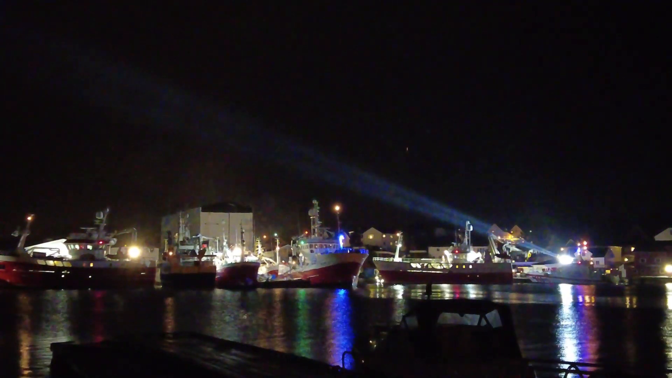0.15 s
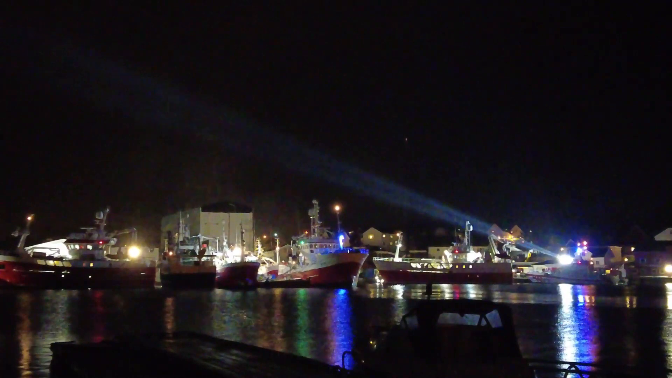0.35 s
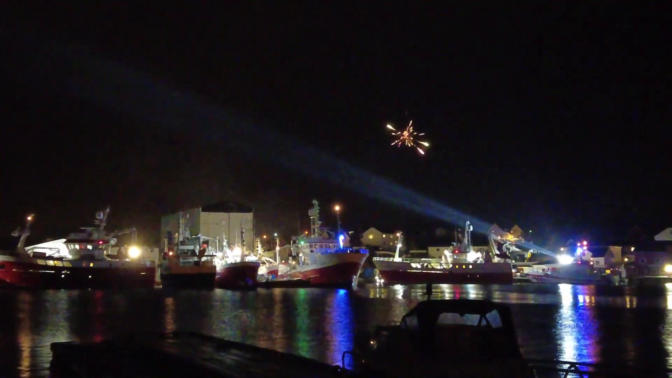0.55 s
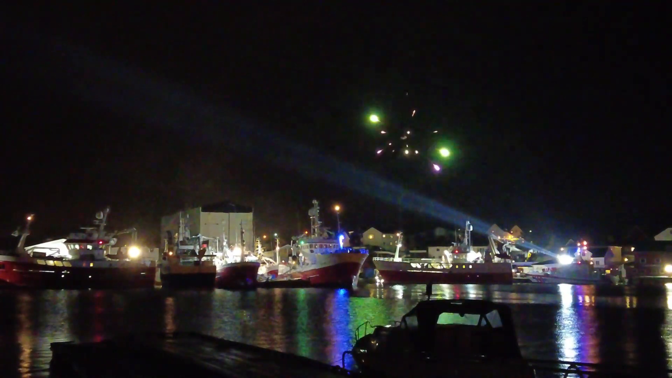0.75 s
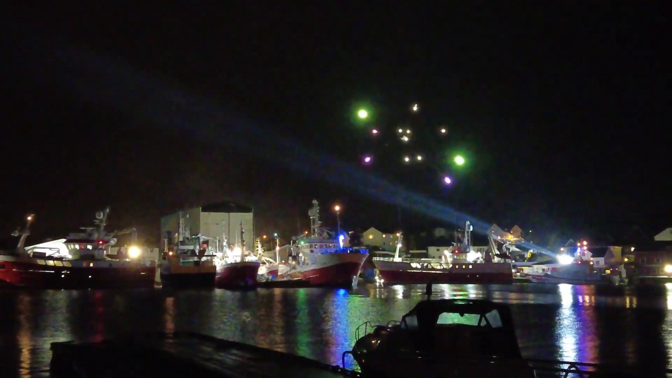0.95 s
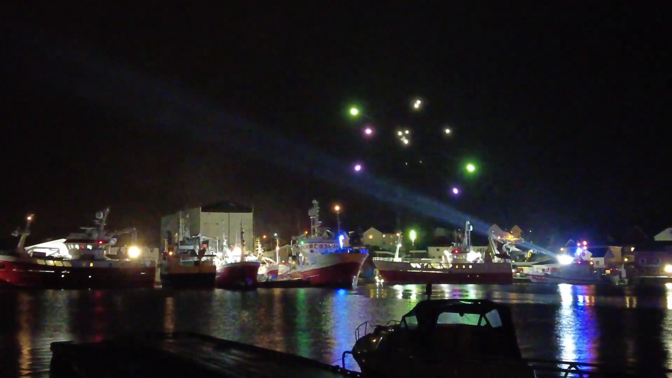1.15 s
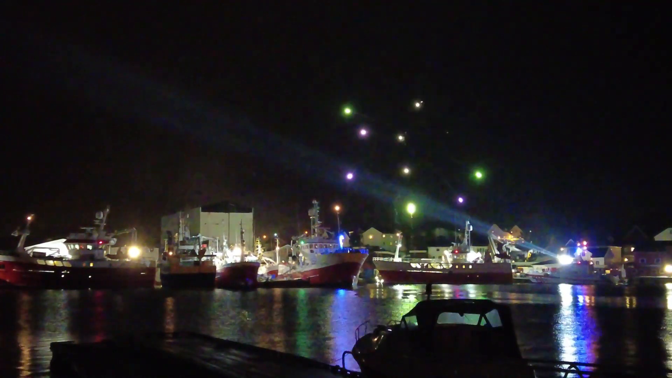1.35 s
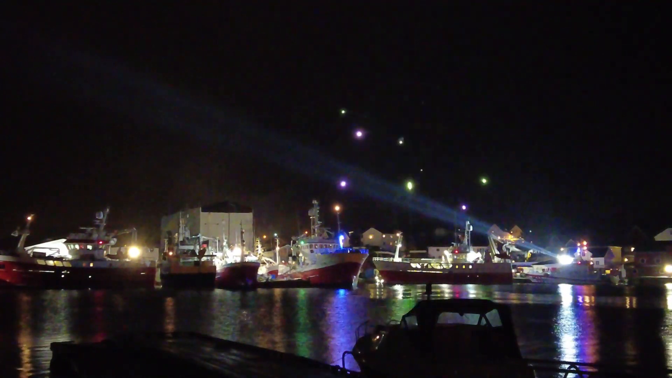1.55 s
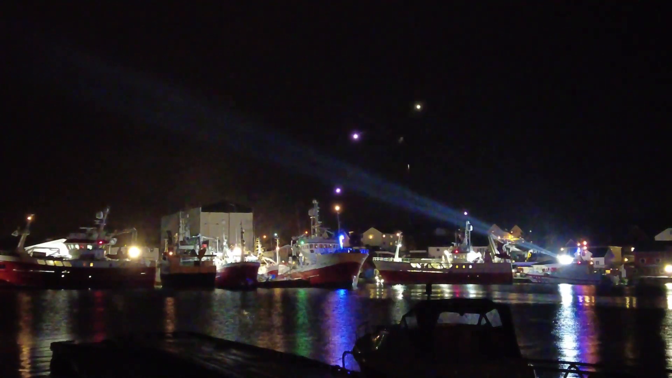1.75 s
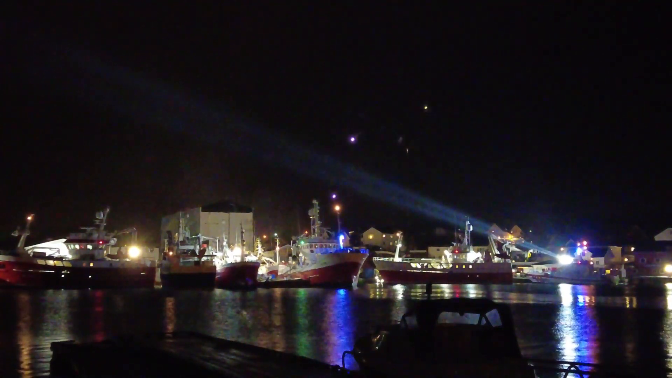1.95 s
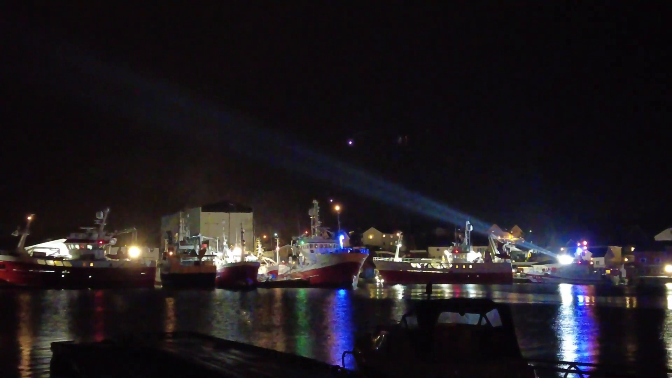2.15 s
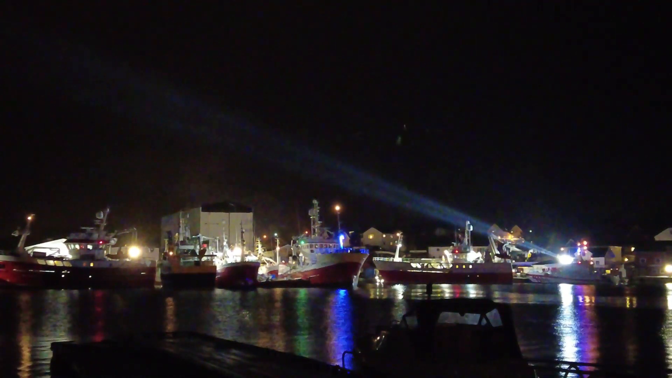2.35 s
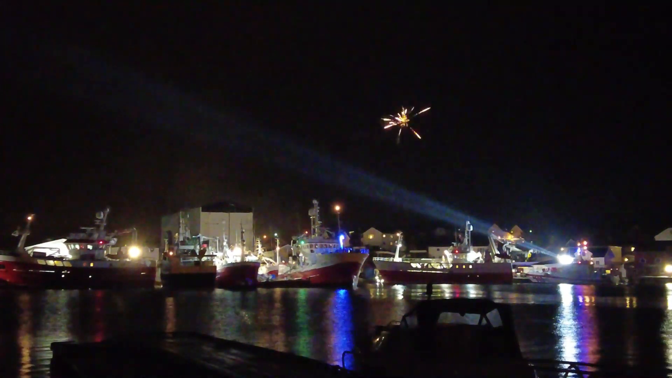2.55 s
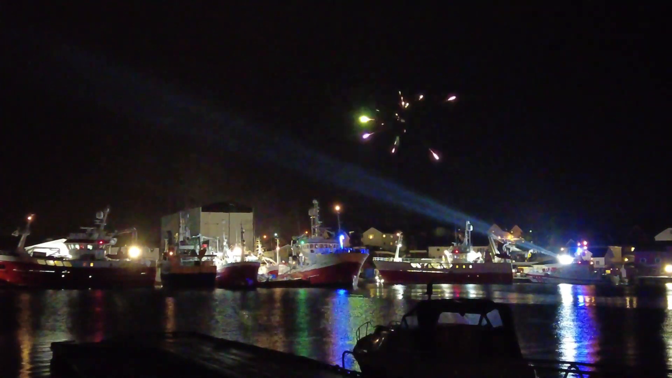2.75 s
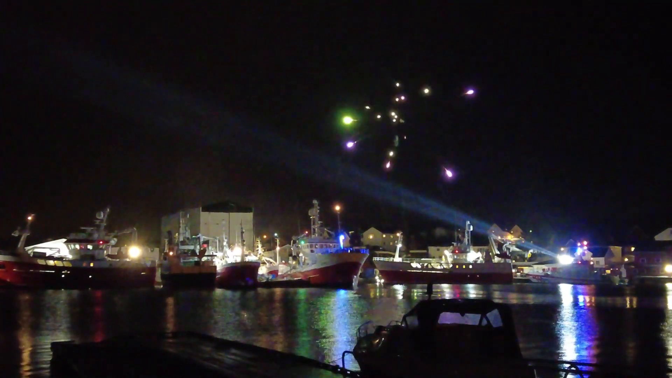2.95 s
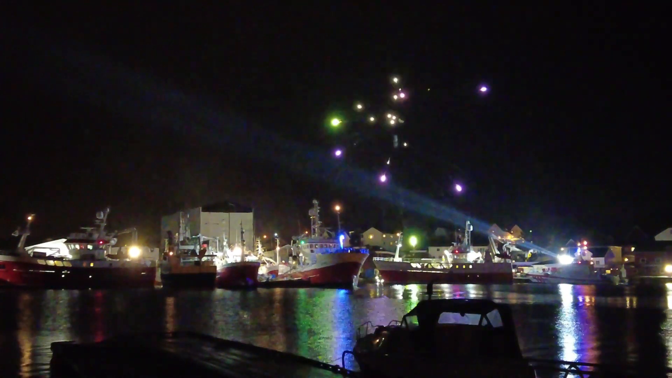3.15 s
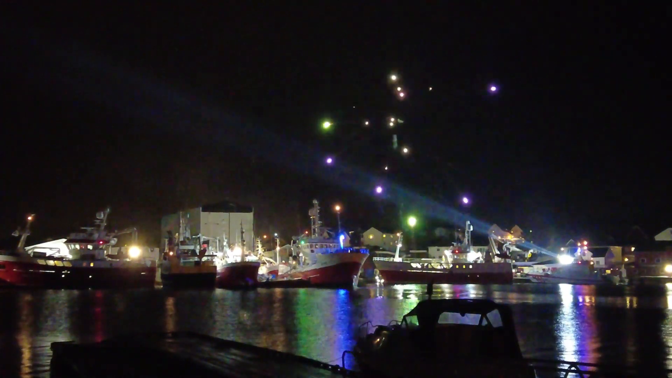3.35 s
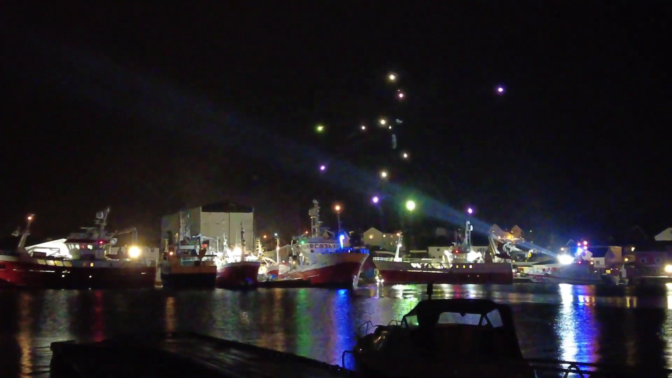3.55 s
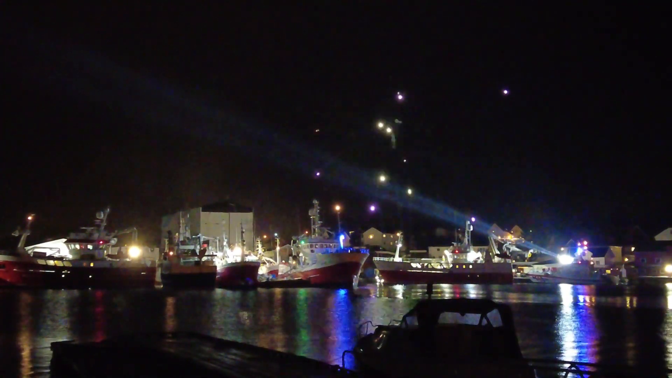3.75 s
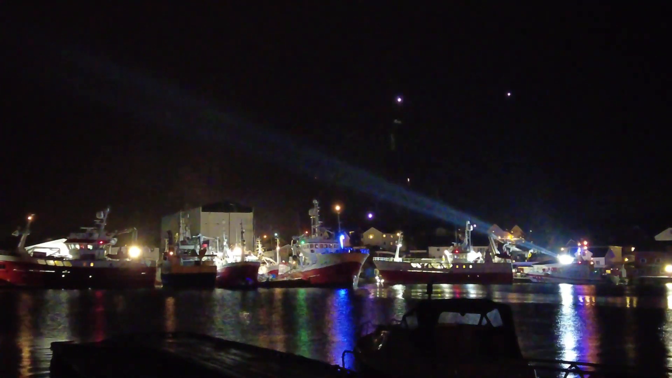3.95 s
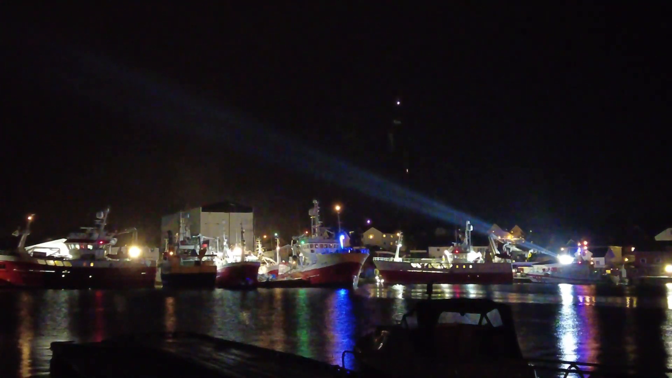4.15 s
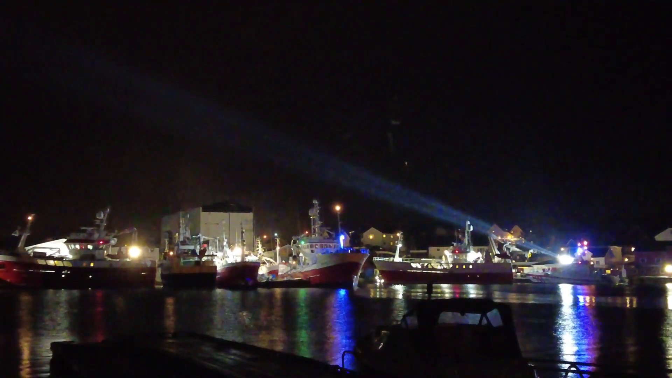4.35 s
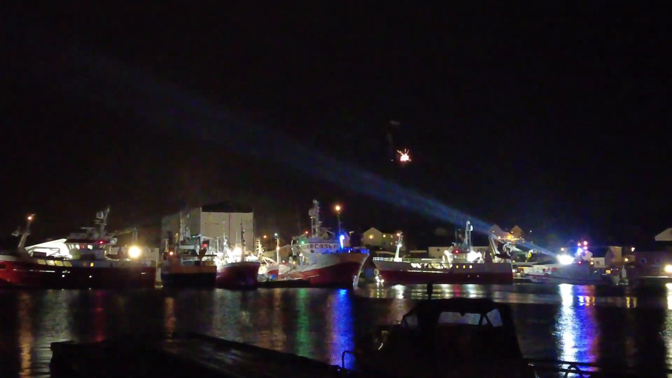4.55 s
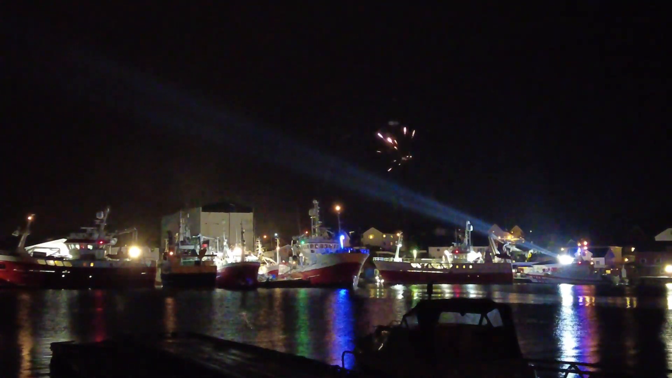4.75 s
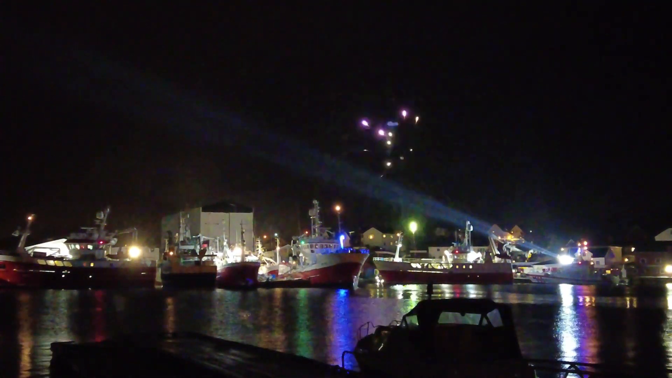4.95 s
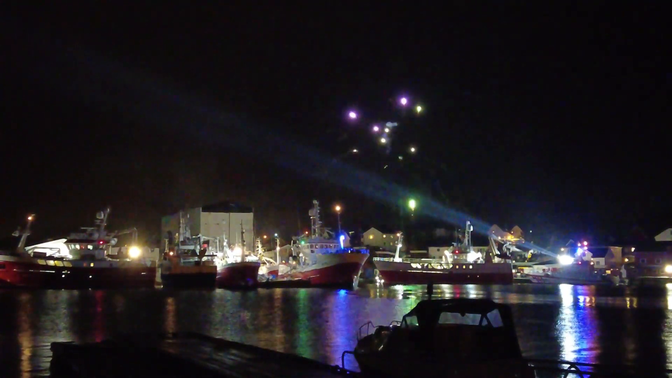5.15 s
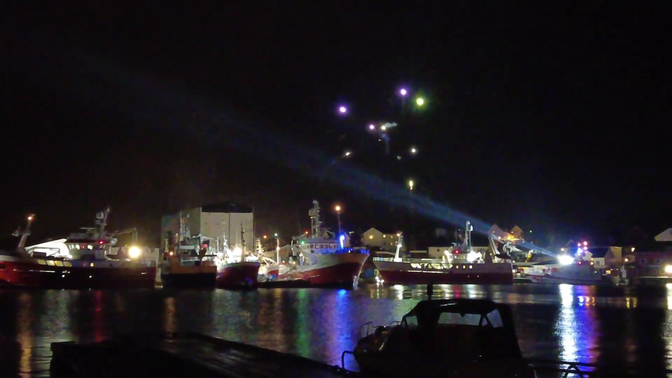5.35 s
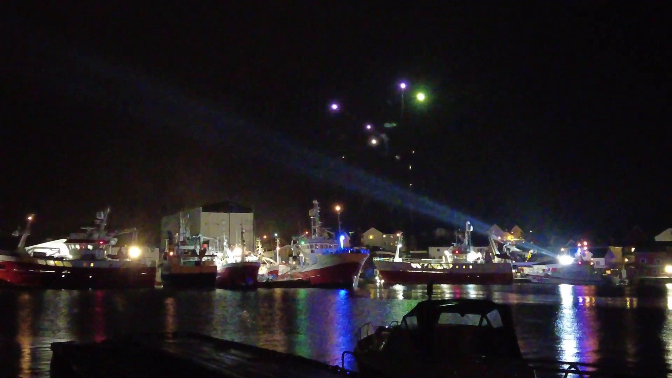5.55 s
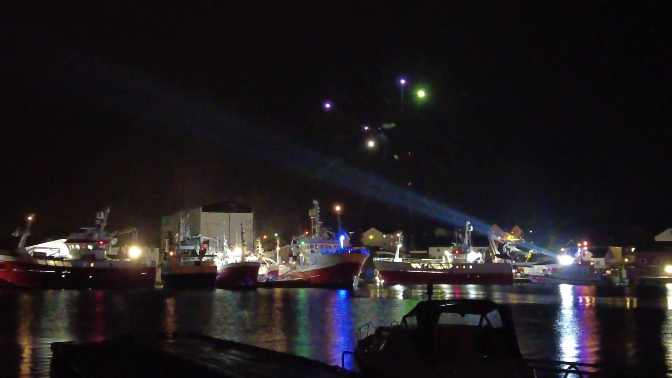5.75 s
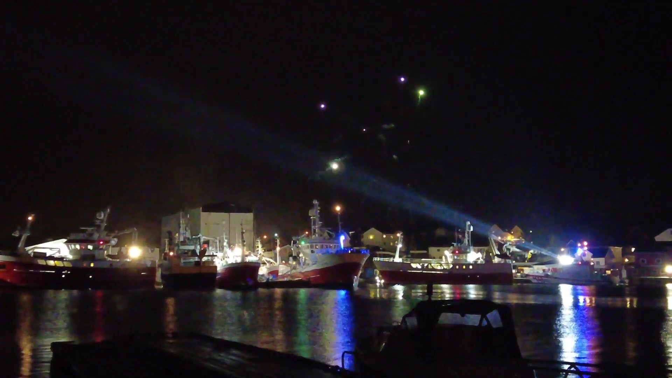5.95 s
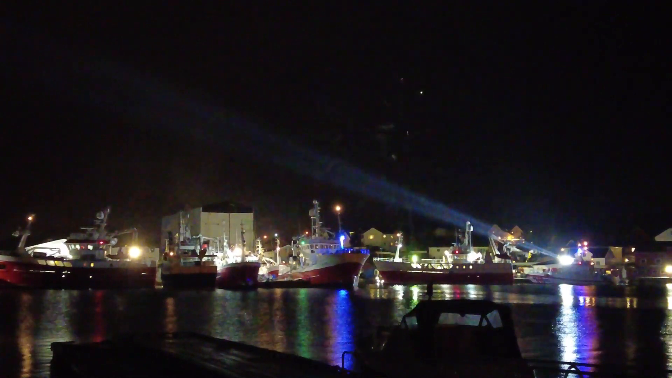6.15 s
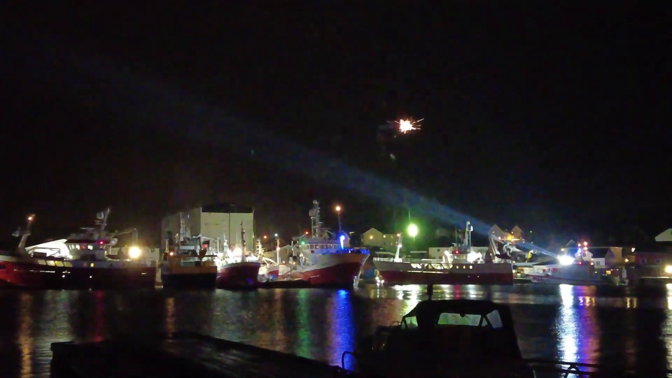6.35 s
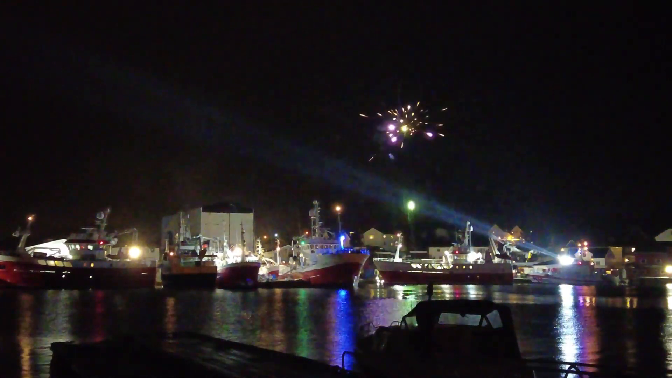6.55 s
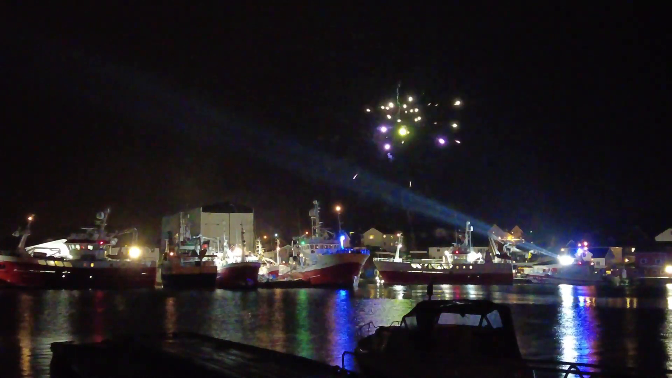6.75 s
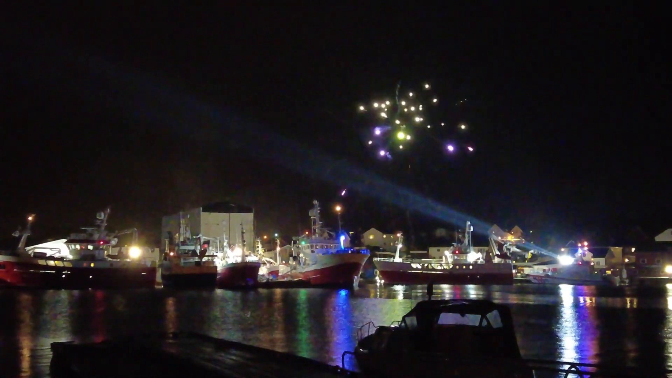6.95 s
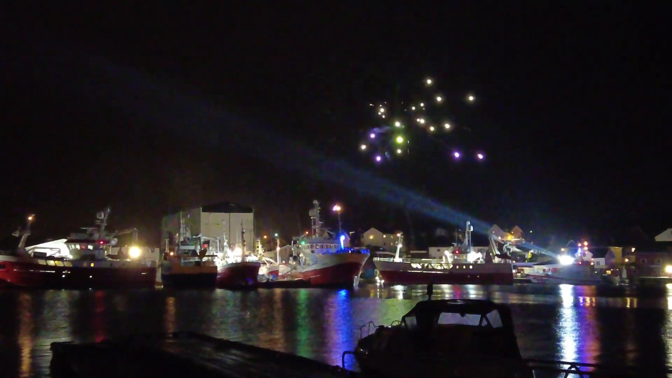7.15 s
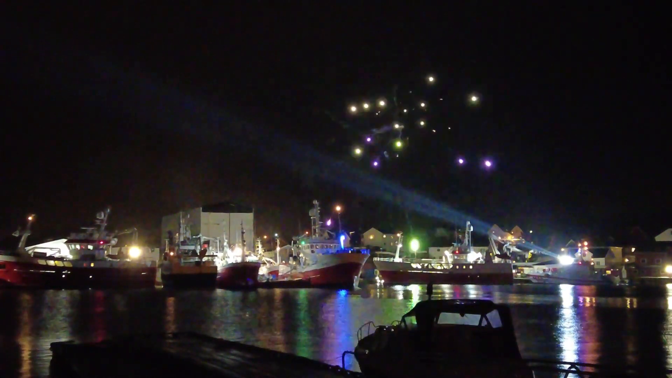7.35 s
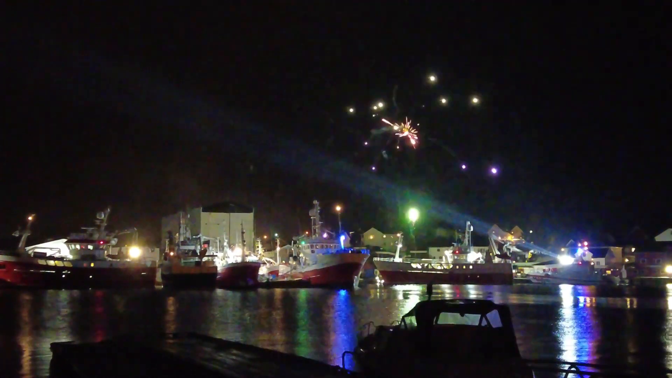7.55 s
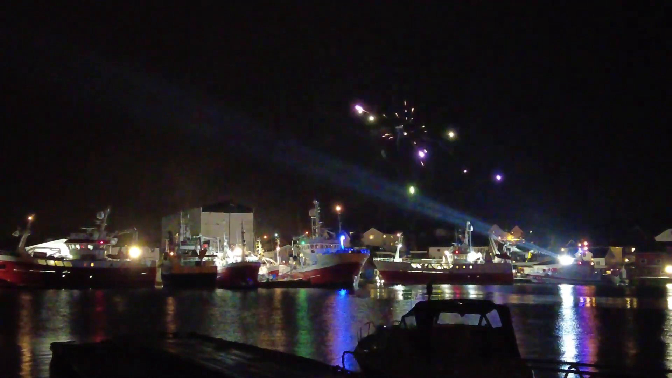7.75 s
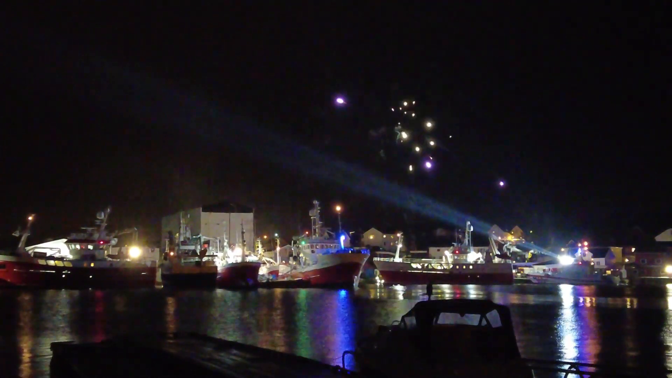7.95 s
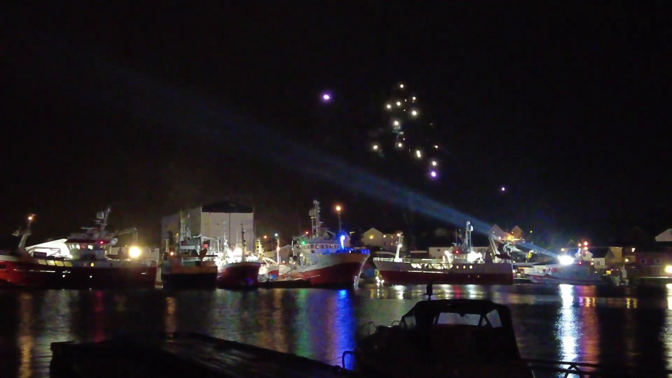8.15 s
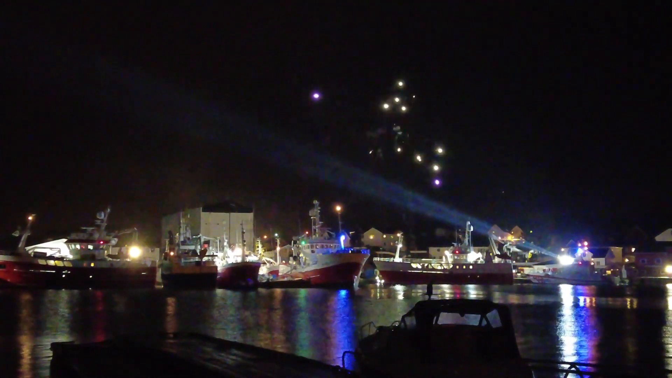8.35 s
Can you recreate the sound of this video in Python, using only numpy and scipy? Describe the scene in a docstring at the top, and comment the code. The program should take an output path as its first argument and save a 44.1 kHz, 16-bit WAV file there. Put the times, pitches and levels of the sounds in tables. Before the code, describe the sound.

Five aerial fireworks bang about two seconds apart over a night harbour, each cracking off hulls and sheds and rolling away across the water.

```python
"""A soft harbour wash, humming ship machinery and close ticks, over the end of an earlier shell's roll;
then five aerial shells burst. Each blast is an N-shaped pulse with its bounce off the water.
Hulls, sheds and quays slap it back as coloured pulses, one wall adds a short ping, and sparse random
echoes roll away. The ticks are noise snaps through casing resonances; a short hiss is gated noise."""
import sys
import numpy as np
from scipy import signal
from scipy.fft import rfft, irfft, next_fast_len
from scipy.io import wavfile
from scipy.ndimage import uniform_filter1d

SR = 44100
rng = np.random.default_rng(int(sys.argv[2]) if len(sys.argv) > 2 else 0)


def dump_mix(stems):
    """Bounce the given channels to the path in sys.argv[1] as a 16-bit WAV at rate SR."""
    frames = np.atleast_2d(stems).T  # one column per channel
    limited = np.clip(frames, -1, 1)  # hard clip at full scale
    pcm = np.round(limited * 32767).astype(np.int16)
    wavfile.write(sys.argv[1], SR, pcm)


N = 370881


def undb(db):
    """Decibels to amplitude ratio."""
    return 10 ** (np.asarray(db) / 20)


def level(x, db):
    """Scale a sound to an RMS level in dB."""
    return x * undb(db) / np.sqrt(np.mean(x ** 2))


def on_log(hz, table):
    """Read a (Hz, value) table along a logarithmic frequency axis."""
    table_hz, values = np.transpose(table)
    return np.interp(np.log(np.maximum(hz, 1)), np.log(table_hz), values)


def colour(x, table):
    """Causal filter with the gain of a (Hz, dB) table, from the folded cepstrum."""
    hz = np.arange(2049) * SR / 4096
    cepstrum = irfft(np.log(undb(on_log(hz, table))))
    middle = len(cepstrum) // 2
    cepstrum[1:middle] *= 2
    cepstrum[middle + 1:] = 0
    impulse = irfft(np.exp(rfft(cepstrum)))
    return signal.fftconvolve(x, impulse[None], axes=1)[:, :x.shape[1]]


# How alike left and right are. Each row: frequency in Hz, likeness from 0 to 1.
STEREO_LIKENESS = [(60, 0.47), (250, 0.91), (500, 0.1), (2000, 0.42), (8000, 0)]


def spread(mid, side):
    """Left and right from two unrelated signals, their likeness set by frequency."""
    size = next_fast_len(N)
    alike = np.clip(on_log(np.arange(size // 2 + 1) * SR / size, STEREO_LIKENESS), 0, 1)
    mid_part = rfft(mid, size) * np.sqrt(1 + alike)
    side_part = rfft(side, size) * np.sqrt(1 - alike)
    return irfft(np.array([mid_part + side_part, mid_part - side_part]), size)[:, :N] / np.sqrt(2)


def band(x, hz, width_hz):
    """Band-pass around a centre frequency."""
    edges = np.clip([hz - width_hz / 2, hz + width_hz / 2], 20, .45 * SR)
    return signal.sosfilt(signal.butter(2, edges, "band", fs=SR, output="sos"), x)


def crisp(x, hz, width_hz):
    """Band-pass without delay, so that neighbouring bands add up to one sharp click."""
    forward = band(x, hz, width_hz)
    return band(forward[..., ::-1], hz, width_hz)[..., ::-1]


# Brightness in the tables below is treble level against bass, usually -11 dB.
BRIGHT_FROM_HZ, USUAL_BRIGHT_DB = 930, -11


def split(x):
    """Bass and treble parts that sum to the whole."""
    low = signal.sosfiltfilt(signal.butter(3, BRIGHT_FROM_HZ, fs=SR, output="sos"), x)
    return low, x - low


def walk(rate):
    """Random levels held 1 / rate s and slewed; spread near 1."""
    hold = int(SR / rate)
    steps = np.repeat(rng.standard_normal(N // hold + 1), hold)
    return 1.145 * uniform_filter1d(uniform_filter1d(steps, hold), hold)[:N]


def add(out, s, sound, pan_db):
    """Mix a sound in at s seconds; pan_db is left minus right."""
    i = int(s * SR)
    n = min(sound.shape[-1], N - i)
    out[:, i:i + n] += sound[..., :n] * undb([[pan_db / 2], [-pan_db / 2]])


# Tone of the distant wash. Each row: frequency in Hz, relative level in dB per Hz.
WASH_COLOUR = [(12, -46.5), (20, 12), (70, 0), (104, -6), (127, -17), (154, -12.5), (193, -14),
               (255, -16.5), (542, -11), (923, -22.5), (1480, -13.5), (2260, -27), (3070, -29.5),
               (7110, -36.5), (14700, -34), (16000, -43)]
WASH_DB = -49.5  # RMS before the flicker
# Ship machinery. Each row: frequency in Hz, RMS level in dB, both before the wavering.
MACHINERY_HUM = [(58.5, -61), (99.8, -51.5), (199.6, -71), (299.4, -75)]


def harbour(bass_flicker_db=1.1, treble_flicker_db=.8, waver_hz=1.0, flutter_db=1.5):
    """Distant coloured noise, bass and treble flickering apart, plus sines that waver in pitch and level."""
    low, high = split(level(colour(spread(*rng.standard_normal((2, N))), WASH_COLOUR), WASH_DB))
    t = np.arange(N) / SR
    hum = 0
    for hz, db in MACHINERY_HUM:
        loudness = undb(db + flutter_db * walk(9)) * np.sqrt(2)
        cycles = hz * t + np.cumsum(waver_hz * walk(4.6)) / SR
        hum = hum + loudness * np.sin(2 * np.pi * cycles)
    wash = low * undb(bass_flicker_db * walk(1.45)) + high * undb(treble_flicker_db * walk(29))
    return wash + hum


# The one hiss, as a single row: start in seconds, end in seconds, centre in Hz, width in Hz,
# RMS level in dB before the grain and the gate.
HISS_BURST = (6.026, 6.102, 9000, 9000, -61)


def hiss():
    """A short hiss between two ticks: band-passed noise, made grainy by fast random level swings."""
    start, end, hz, width_hz, db = HISS_BURST
    gate = np.interp(np.arange(N) / SR, [start - .004, start, end, end + .012], [0, 1, 1, 0])
    grain = undb(8.6 * walk(330))
    return gate * grain * level(band(rng.standard_normal((2, N)), hz, width_hz), db)


# Clear ticks close by. Each row: start in seconds, nominal peak at 3.5-6.5 kHz in dB, then nominal level
# over 6 ms in dB at 1-2 kHz, at 2-3.5 kHz and above 6.5 kHz; the random rattle varies them all.
CLEAR_TICKS = [(0.0994, -31, -33, -45, -54), (0.186, -50, -49, -56, -53), (0.2033, -49, -54, -57, -63),
               (0.2254, -48, -51, -63, -55), (0.2373, -45, -38.5, -55, -54), (0.2557, -45, -46, -54, -51),
               (0.3817, -42, -43, -44.5, -56), (0.4888, -46, -59, -51, -58), (0.5247, -45, -50, -54, -53),
               (0.549, -46, -41, -49, -52), (0.7008, -43, -40, -55, -52), (0.763, -54, -55, -51, -50),
               (0.7904, -55, -60, -62, -69), (0.9126, -45, -41, -50, -54), (0.9293, -42, -38, -49, -52),
               (0.95, -41, -33.5, -48, -46), (0.9594, -39, -40, -45, -46), (1.015, -51, -47, -51, -54),
               (1.1089, -53, -58, -50, -64), (1.1362, -51, -51, -47, -55), (1.1605, -53, -69, -52, -69),
               (1.472, -33, -44, -42, -46), (1.7945, -43, -48, -49, -52), (1.858, -51, -48, -59, -45),
               (2.0244, -53, -46, -60, -53), (2.0718, -45, -50, -53, -50), (2.1033, -45, -45, -52, -49),
               (2.3303, -35.5, -34.5, -63, -48), (2.5231, -54, -47, -49, -46),
               (2.5756, -42.5, -36, -47, -48), (2.5934, -56, -41, -53, -55), (2.7492, -42, -38, -44, -47),
               (2.7874, -49, -45, -54, -55), (2.7936, -43, -37, -51, -57), (2.8766, -51, -47, -51, -54),
               (2.9038, -40, -43, -45, -46), (3.0465, -48, -42, -54, -64), (3.086, -51, -45, -57, -52),
               (3.157, -47, -59, -59, -53), (4.3879, -55, -46, -59, -52), (4.7958, -33.5, -39, -61, -49),
               (4.8396, -53, -38, -63, -53), (4.8837, -45, -43, -55, -56), (4.917, -53, -39, -50, -59),
               (4.9566, -46, -58, -62, -56), (5.005, -43, -39.5, -60, -48), (5.2316, -36, -37, -48, -51),
               (5.848, -48, -40, -51, -51), (5.9029, -34.5, -43, -60, -46), (6.0306, -50, -40, -55, -43),
               (6.0958, -48, -40, -52, -40), (6.129, -47, -41, -63, -58), (6.568, -48, -49, -59, -51),
               (6.7412, -46, -50, -46, -58), (6.7664, -42, -36, -49, -51), (6.799, -48, -58, -59, -55),
               (6.8243, -52, -53, -62, -58), (6.8419, -34.5, -31, -40, -44), (6.8574, -52, -50, -51, -55),
               (6.9789, -49, -48, -50, -54), (7.624, -52, -31, -48, -51), (7.685, -44, -38, -54, -51),
               (7.7676, -38, -38, -55, -51), (7.926, -49, -34, -62, -52), (8.1077, -52, -53, -56, -47),
               (8.1116, -44, -36, -52, -49), (8.1773, -46, -39, -52, -50)]
# Where the camera casing rings, in the order of the tick levels; the last is the body under the 1-2 kHz
# ring. Each row: centre in Hz, width in Hz.
CASING_RINGS = [(4900, 3000), (1400, 1400), (2750, 1300), (10500, 8200), (520, 640)]
# Crisp top of the nearest wall's slap. One reference level in dB per shell, from which ticks() steps down.
FIRST_SLAP_SNAPS = [-26, -28, -35, -29, -24.5]
BODY_DB, TICK_PAN_DB = -10, -1.5  # body against the 1-2 kHz ring; left minus right


def ticks(rattle=0.12, t60_ms=9.5, ring=0.18, ring_ms=170.0, apart=1.0, faint_per_second=170,
          faint_db=-62, scatter_db=5.5, body_scatter_db=1.5):
    """Snaps in the camera casing: a click with a rattle, partly unlike at the ports, clear or faint patter."""
    chance = rng.standard_normal((1500, 4))
    gap, size = rng.exponential(size=(1500, 2)).T
    tilt_db = np.array([-6, 0.5, -9.5, -9.0])
    faint = []
    for s, extra, scatter in zip(np.cumsum(gap) / faint_per_second, size, chance):
        if s < N / SR:
            faint.append((s, *(faint_db + min(scatter_db * extra, 8.0) + tilt_db + 3.6 * scatter)))
    # 1 ms ahead of the nearest wall's slap, since the click sits 30 samples into the snap
    jolts = [(shell[0] + WALL_SLAPS[0][0] - .0010, db - 6.5, -80, -80, db - 14)
             for shell, db in zip(SHELL_BURSTS, FIRST_SLAP_SNAPS)]
    ms, parts = np.arange(900) / SR * 1000, np.zeros((len(CASING_RINGS), 2, N))
    for s, *levels in list(CLEAR_TICKS) + jolts + faint:
        noise = rng.standard_normal((3, len(ms)))
        decay = 1000. ** (-ms / t60_ms) + ring * 1000. ** (-ms / ring_ms)
        snap = rattle * (noise[0] + apart * noise[1:]) * decay
        snap[:, 30] += np.sign(noise[0, 0]) * undb(apart * 3 * noise[1:, 0])  # the click
        body_db = levels[1] + BODY_DB + body_scatter_db * noise[0, 1]
        for part, db in zip(parts, levels + [body_db]):
            add(part, s, undb(db) * snap, TICK_PAN_DB)
    # a bare click heard through each ring for 6 ms sets its scale
    unit = [crisp(np.eye(1, int(.006 * SR), 130)[0], *mode) for mode in CASING_RINGS]
    scales = [np.abs(unit[0]).max()] + [u.std() * 3.1 for u in unit[1:]]
    return sum(crisp(part, *mode) / scale for part, mode, scale in zip(parts, CASING_RINGS, scales))


# Tone of an echo, in the roll and the slaps. Each row: frequency in Hz, relative level in dB per Hz.
ECHO_COLOUR = [(18, -66), (30, -9), (108, -6), (157, -5), (272, 0), (485, 0), (781, -15), (885, -11.5),
               (1110, -16.5), (1260, -12.5), (1700, -18.5), (3790, -35), (4400, -37.5), (6910, -48),
               (12000, -65), (15600, -71), (22000, -120)]
# The roll that follows every shell. Each row: seconds after the burst, level in dB before the shell's
# strength and the final gain, brightness in dB.
ROLL_COURSE = [(.004, -50, -8), (.012, -30, -6), (.035, -30, -3), (.09, -29.5, -7), (0.201, -26.5, -9),
               (0.284, -25, -7), (0.321, -26.5, -8), (.45, -28, -8.5), (.6, -29.5, -8), (0.672, -33, -10),
               (.77, -30, -9), (.85, -33, -10), (.95, -30, -12.5), (1.05, -34.5, -10.5),
               (1.33, -37.5, -9.5), (1.42, -35, -11.5), (1.7, -38, -12), (2.0, -42.5, -14), (2.6, -54, -10),
               (3.1, -66, -10), (3.6, -80, -10)]
# Strength of each shell's roll in dB, the earlier shell last.
ROLL_STRENGTHS = [0.22, 0.13, -0.17, -0.087, -0.15, 0]
# Edges in Hz of the bands that swell on their own.
SWELL_EDGES = [330, 890, 1900, 3400]
EARLIER_SHELL_S = -2.65  # only the end of its roll is left


def swarm(rate):
    """Sparse random impulses of uneven size, rate per second, coloured as echoes."""
    hits = (rng.random((2, N)) < rate / SR) * rng.standard_normal((2, N))
    return colour(spread(*hits), ECHO_COLOUR) / np.sqrt(rate)


def roll(bass_per_second=900, treble_per_second=4000, patchy_db=(1.7, 1.7, 1.8, 1.8, 1.5),
         patch_per_second=(18, 22, 30, 30, 30), far_dull_db=16.0, gain_db=-0.54):
    """Uneven reflectors return the blast; bands swell alike after each shell and late echoes lose treble."""
    t = np.arange(N) / SR
    low, high = split(swarm(bass_per_second))[0], split(swarm(treble_per_second))[1]
    top = signal.sosfilt(signal.butter(1, 3000, "high", fs=SR, output="sos"), high)
    low_power, high_power, age = np.zeros(N), np.zeros(N), t - EARLIER_SHELL_S
    after, db, bright_db = np.transpose(ROLL_COURSE)
    for (burst, *_), shell_db in zip(list(SHELL_BURSTS) + [[EARLIER_SHELL_S]], ROLL_STRENGTHS):
        now = t >= burst
        since = t[now] - burst
        low_db = shell_db + np.interp(since, after, db, right=-120)
        high_db = low_db + np.interp(since, after, bright_db - USUAL_BRIGHT_DB)
        low_power[now] += undb(2 * low_db)
        high_power[now] += undb(2 * high_db)
        age[now] = np.minimum(age[now], since)  # seconds since the latest burst
    high = high - top * (1 - undb(-far_dull_db * age))  # far_dull_db is lost per second of age
    rest = (low * np.sqrt(low_power) + high * np.sqrt(high_power)) * undb(gain_db) / low.std()
    # reading the swells by age gives every shell the same pattern
    out, place = 0, (age * SR).astype(int) % N
    for hz, depth_db, rate in zip(list(SWELL_EDGES) + [None], patchy_db, patch_per_second):
        part = signal.sosfiltfilt(signal.butter(2, hz, fs=SR, output="sos"), rest) if hz else rest
        out = out + part * undb(depth_db * walk(rate)[place])
        rest = rest - part
    return out


# One reflector's ping, as a single row: delay in seconds, frequency in Hz, t60 in ms,
# then peak levels in dB before the pan, for the first four shells in turn.
REFLECTOR_PING = (.3955, 1520, 26, (-29, -28, -21, -29))


def ping():
    """A short sine that swells in within 0.35 ms and dies away."""
    out, t = np.zeros((2, N)), np.arange(2000) / SR
    late, hz, t60_ms, levels = REFLECTOR_PING
    ring = np.sin(2 * np.pi * hz * t) * np.minimum(t / 0.00035, 1) * 1000. ** (-t * 1000 / t60_ms)
    for (burst, *_), db in zip(SHELL_BURSTS, levels):
        add(out, burst + late, undb(db) * ring / ring.max(), -1.5)
    return out


# Walls that slap each blast back. Each row: delay in seconds, brightness in dB, left port's lead in ms,
# depth in ms, then levels in dB for each shell in turn. Delays are before the shifts below, levels and
# brightness before the gains in slaps(), leads before the left delay in record().
WALL_SLAPS = [(0.0211, -13, -0.45, 0.5, [-11, -14, -16, -11, -13]),
              (0.0415, 4, 0.47, 1, [-22, -31, -34, -26, -34]),
              (0.0478, -11, 0.48, 0.5, [-10, -13, -17, -11, -12]),
              (0.122, -18, -0.33, 0.8, [-30, -19, -32, -19]),
              (0.148, -14, -0.25, 1.5, [-23, -23, -17, -22]), (0.184, -17, 0.09, 0.7, [-16, -13, -17, -18]),
              (0.2085, -22, -0.12, 0.6, [-17, -15, -19, -23]),
              (0.2125, -20, -0.12, 0.6, [-19, -16, -15, -22]),
              (0.2175, -20, -0.12, 0.6, [-21, -24, -19, -17]),
              (0.225, -15, -0.0, 0.7, [-22, -30, -16, -28]), (0.2475, -12, -0.1, 0.7, [-24, -19, -26, -22]),
              (0.296, -8, -0.1, 3, [-19, -22, -18, -18]), (0.336, -12, -0.1, 0.8, [-24, -22, -24, -17]),
              (0.262, -14, -0.2, 3, [-21, -22, -18, -18]), (0.2695, -11, -0.1, 0.6, [-18, -24, -15, -18]),
              (0.2738, -14, -0.26, 0.7, [-17, -15, -15, -13]),
              (0.2798, -10, 0.1, 0.5, [-13, -14, -15, -14]), (0.282, -6, -0.33, 5, [-18, -18, -17, -17]),
              (0.2835, -11, 0.1, 0.5, [-11, -10, -10, -12]), (0.2872, -13, 0.1, 0.6, [-14, -14, -15, -20]),
              (0.318, -5, -0.19, 4, [-28, -27, -19, -21]), (0.396, -8, -0.55, 0.5, [-22, -13, -22, -14]),
              (0.407, -15, -0.29, 0.6, [-20, -28, -25, -17]),
              (0.4165, -18, -0.37, 1.2, [-26, -32, -18, -17]),
              (0.445, -6, -0.21, 0.5, [-28, -19, -25, -32]), (0.49, -18, -0.33, 0.8, [-20, -13, -20, -19]),
              (0.508, -16, -0.05, 0.7, [-29, -24, -20, -32]), (0.547, -10, 0.05, 0.7, [-19, -27, -34, -31]),
              (0.578, -21, -0.17, 0.7, [-11, -23, -15, -30]),
              (0.599, -19, -0.34, 0.5, [-17, -20, -21, -18]), (0.627, -13, 0.49, 0.5, [-16, -14, -16, -18]),
              (0.653, -12, 0.06, 0.7, [-25, -25, -23, -27]), (0.766, -5, -0.2, 1, [-23, -25, -25, -29]),
              (0.793, -21, 0.12, 1.2, [-26, -18, -23, -23]), (0.826, -10, -0.08, 0.8, [-37, -22, -36, -27]),
              (0.876, -17, 0.07, 0.7, [-29, -29, -24, -36]), (0.914, -18, -0.06, 0.8, [-21, -25, -30, -24]),
              (0.948, -15, -0.1, 0.6, [-24, -28, -23, -28]), (1.056, -19, 0.2, 0.8, [-26, -21, -40, -37]),
              (1.075, -8, 0.27, 0.8, [-27, -30, -33, -35]), (1.096, -10, 0.24, 0.8, [-27, -32, -40, -30]),
              (1.138, -9, 0.19, 0.8, [-34, -27, -40, -36]), (1.222, -14, 0.1, 0.8, [-28, -28, -36]),
              (1.274, -10, 0.17, 0.8, [-27, -32, -41]), (1.376, -18, 0.08, 1, [-24, -28, -23]),
              (1.408, -14, 0.09, 0.8, [-40, -27, -30]), (1.519, -17, 0.12, 0.8, [-26, -34, -28]),
              (1.538, -15, 0.1, 0.8, [-27, -30, -38]), (1.597, -14, 0.15, 0.8, [-31, -35, -27]),
              (1.621, -10, -0.03, 0.8, [-38, -29, -28]), (1.688, -14, 0.03, 1, [-35, -24, -23]),
              (1.733, -15, -0.02, 0.8, [-31, -35, -39]), (1.793, -17, 0.17, 0.8, [-33, -33]),
              (1.847, -23, 0.3, 0.8, [-30, -28]), (1.933, 0, 0.24, 0.8, [-32, -32])]
# Each shell bursts at its own spot, so far walls answer early or late: their span of delays in seconds,
# then the shift in ms for each shell.
FAR_SPAN = (.55, 1.0)
FAR_SHIFTS = [0, 2.4, -4.2, 2.8, 0]
# Stepped faces of one large shed: their span of delays in seconds, then the shift in ms for each shell.
SHED_SPAN, SHED_SHIFTS = (.276, .29), [0, -.5, .8, -1.0, 0]
STRAY_SLAPS_PER_S, STRAY_OVER_ROLL_DB = 6, 4  # small walls met by one shell only


def slap_rows(scatter_db=2.5):
    """Slaps as s, level dB, brightness dB, left lead ms, depth ms: walls per shell, then random strays."""
    after, roll_db, _ = np.transpose(ROLL_COURSE)
    rows = []
    for k, (burst, *_) in enumerate(SHELL_BURSTS):
        chance = rng.standard_normal((60, 4))
        for late, bright_db, lead_ms, deep_ms, levels in WALL_SLAPS:
            if k < len(levels):
                far_ms = FAR_SHIFTS[k] * (FAR_SPAN[0] < late < FAR_SPAN[1])
                shed_ms = SHED_SHIFTS[k] * (SHED_SPAN[0] < late < SHED_SPAN[1])
                rows.append((burst + late + far_ms / 1000 + shed_ms / 1000,
                             levels[k], bright_db, lead_ms, deep_ms))
        lates = .3 + np.cumsum(rng.exponential(size=60)) / STRAY_SLAPS_PER_S
        for late, (a, b, c, d) in zip(lates, chance):
            if late < after[-1]:
                db = np.interp(late, after, roll_db) + STRAY_OVER_ROLL_DB + scatter_db * a
                rows.append((burst + late, db, 2.5 * b - 16.0, 0.64 * c, np.exp(0.49 * d)))
    return [row for row in rows if row[0] < N / SR]


# Extra tone of a slap against the roll. Each row: frequency in Hz, gain in dB.
FLAT_WALL_TONE = [(100, -6), (190, -6), (290, 0), (480, 0), (620, 4), (850, 6), (1100, 2)]


def slaps(gain_db=3.2, treble_db=-3.2, trough_ms=.45, bounce=.45, bounce_ms=1.35, rough=0.14,
          unlike=.4, treble_smear_ms=2.0):
    """A coloured pulse per wall, nearer port first; deep walls return ragged clusters, treble scatters most."""
    bass, treble, ms = np.zeros((2, N)), np.zeros((2, N)), np.arange(-800, 800) / SR * 1000
    for s, db, bright_db, lead_ms, deep_ms in slap_rows():
        chance = rng.standard_normal((5, len(ms)))
        ragged = rough * np.sqrt(deep_ms / 20) * min(deep_ms / 2, 1)
        face = ragged * chance[0] * np.exp(-(ms / (2 * deep_ms)) ** 2)
        side = unlike * chance[1:3] * np.abs(face)
        face = face - (ms == 0) / (1 + deep_ms / 1.5)  # a flat wall gives one pulse, weaker the deeper it is
        half = int(round(lead_ms * SR / 2000))
        facets = np.array([np.roll(face, -half), np.roll(face, half)]) + side
        add(bass, s + (ms[0] + trough_ms) / 1000, undb(db) * facets, 0)
        grit = chance[3:] * np.exp(-((ms - 1) / (deep_ms + treble_smear_ms)) ** 2)
        treble_gain = undb(db + bright_db - USUAL_BRIGHT_DB)
        add(treble, s + ms[0] / 1000, treble_gain * (0.52 * facets + 0.062 * grit), 0)
    hz = np.arange(2049) * SR / 4096
    # with the face's minus sign: a trough between two crests
    pulse = np.fft.fftshift(irfft(undb(on_log(hz, ECHO_COLOUR) + on_log(hz, FLAT_WALL_TONE))))[None]
    pulse = pulse - bounce * np.roll(pulse, int(bounce_ms * SR / 1000))  # water's copy lifts the later crest
    bass_peak = split(pulse)[0].max()
    firm = split(signal.fftconvolve(bass, pulse, "same", axes=1))[0] / bass_peak
    echo_peak = split(colour(np.eye(1, 2000, 500), ECHO_COLOUR))[0].max()
    sharp = undb(treble_db) * split(colour(treble, ECHO_COLOUR))[1] / echo_peak
    return (firm + sharp) * undb(gain_db)


# The five blasts. Each row: start in seconds, nominal peak in dB before a 0.7 dB lift and the air's
# low-pass, left minus right in dB, pulse length in ms, water bounce delay in ms, bounce level in dB.
SHELL_BURSTS = [(1.2632, -.5, .4, 1.65, 2.9, -11), (3.3011, -2.6, -.8, 1.7, 3.1, -10),
                (5.3668, -.8, -1.2, 1.4, 2.4, -10), (7.1482, -1.8, -.5, 1.7, 3.2, -8),
                (8.2985, -2.2, -.4, 1.4, 3.0, -10)]


def shells(rise_ms=.1, suction=.56, back_ms=.55, drag_ms=2.6, air_hz=4300):
    """Steep front, fall into rounded suction, quick return; water adds a duller copy with a long trough."""
    out, ms = np.zeros((2, N)), np.arange(900) / SR * 1000
    for s, db, pan_db, long_ms, late_ms, bounce_db in SHELL_BURSTS:
        front = np.interp(ms, [0, rise_ms, .45 * long_ms, .75 * long_ms, long_ms, long_ms + back_ms],
                          [0, 1, 0, -.8 * suction, -suction, 0])
        bounce = np.interp(ms - late_ms, [-.9, 0, .9, .9 + drag_ms, 2 + drag_ms, 3 + drag_ms],
                           [0, 1, -.5, -.3, .25, 0])
        fade = np.clip(late_ms + .5 - ms, 0, 1)  # the direct pulse gives way to the bounce
        blast = front * fade + undb(bounce_db) * bounce
        # the quay and the boats nearby scatter for a few ms
        scatter = band(rng.standard_normal((2, len(ms))), 1500, 1800)
        near = undb(-18) * scatter * np.exp(-ms / 6.0) * (ms > 1.5)
        add(out, s, undb(db + .7) * (blast + near), pan_db)
    return signal.sosfilt(signal.butter(2, air_hz, fs=SR, output="sos"), out)


def scene():
    """Every layer of the harbour night together."""
    return shells() + slaps() + ping() + roll() + ticks() + hiss() + harbour()


# Tone of the microphone capsule. Each row: frequency in Hz, gain in dB.
CAPSULE_TONE = [(20, 1.5), (2300, -0.5), (3200, 3), (3800, 0), (4400, 3.5), (5600, 0.5), (7000, 0),
                (10600, -3.5), (16000, -4.5)]
PORTS_APART_HZ, TOP_HZ = 223, 16300  # the ports differ above the first; the top is cut at the second
LEFT_LATE_MS = 1000 / SR  # one sample: everything reaches the left port a little late


def record(dry):
    """Close ports hear long waves alike; the capsule colours the sound and the recorder cuts the top."""
    mid, side = (dry[0] + dry[1]) / 2, (dry[0] - dry[1]) / 2
    side = signal.sosfilt(signal.butter(1, PORTS_APART_HZ, "high", fs=SR, output="sos"), side)
    left = np.interp(np.arange(N) - LEFT_LATE_MS * SR / 1000, np.arange(N), mid + side)
    heard = colour(np.array([left, mid - side]), CAPSULE_TONE)
    return signal.sosfilt(signal.ellip(10, .2, 90, TOP_HZ, fs=SR, output="sos"), heard)


dry = scene()
out = record(dry)
dump_mix(out)
```